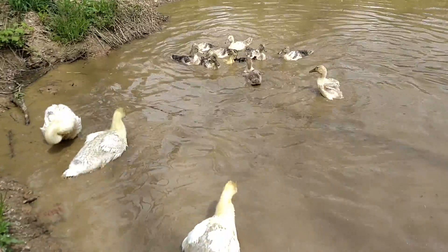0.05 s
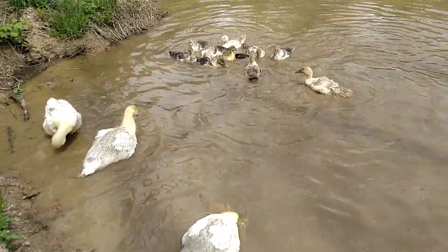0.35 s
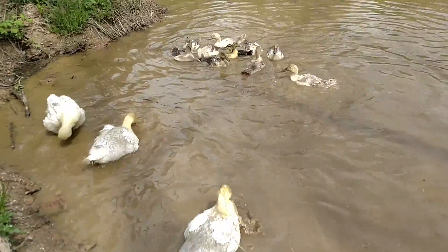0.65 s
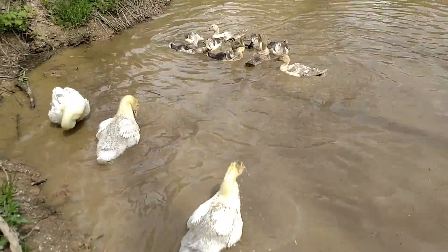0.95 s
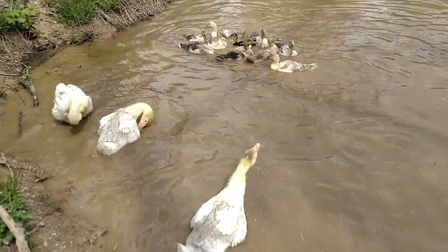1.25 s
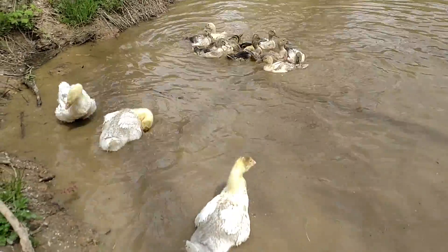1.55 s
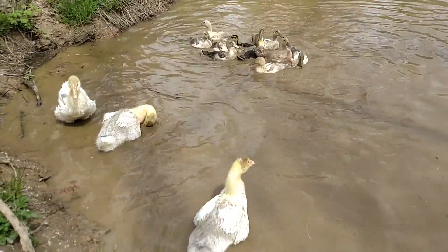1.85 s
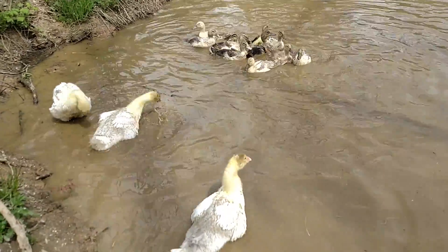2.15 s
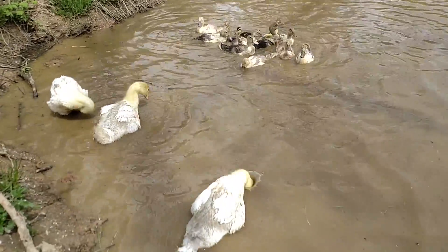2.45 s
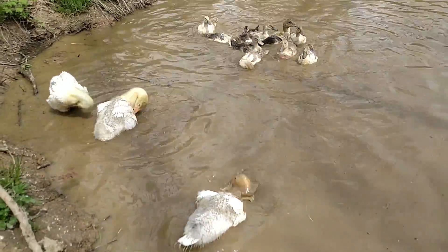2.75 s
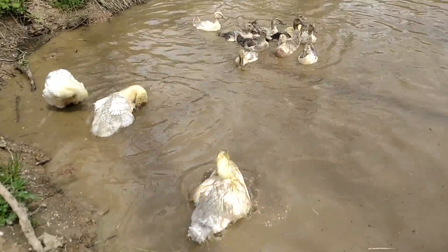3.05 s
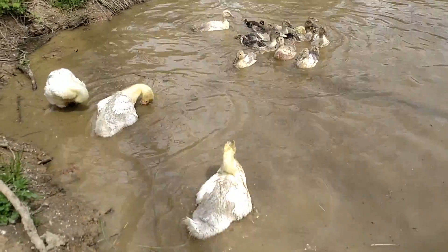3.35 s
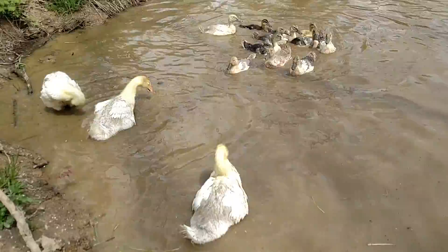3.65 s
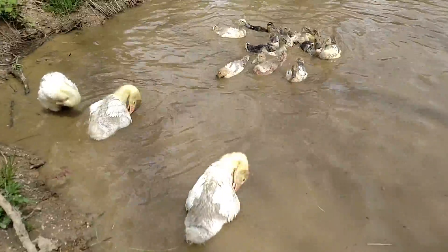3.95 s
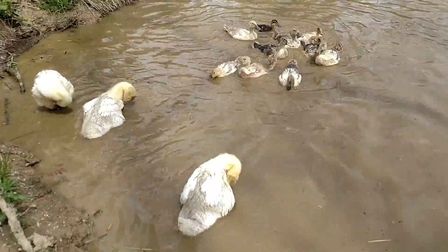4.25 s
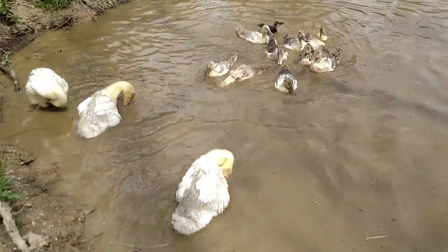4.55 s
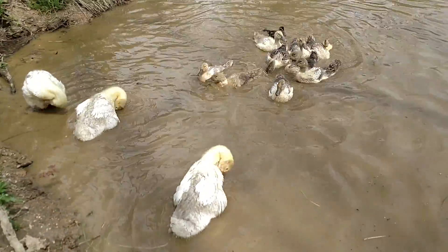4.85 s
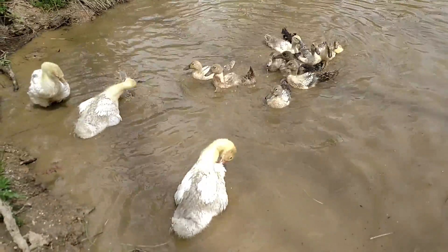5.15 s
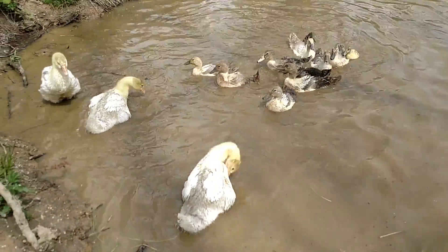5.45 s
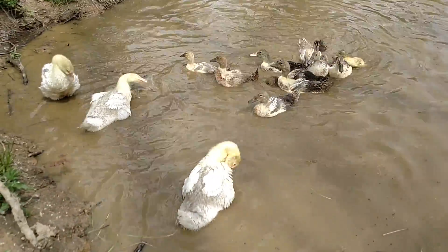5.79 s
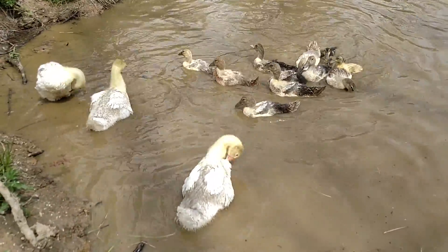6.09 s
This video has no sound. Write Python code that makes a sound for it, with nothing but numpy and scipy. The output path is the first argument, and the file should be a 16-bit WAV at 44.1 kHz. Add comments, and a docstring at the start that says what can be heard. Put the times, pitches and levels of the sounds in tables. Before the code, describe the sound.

Pond water laps and gurgles gently close to the microphone, over a low wind rumble with a few brief buffets. Young geese dabble their bills, making small bubbly plops and drips, with sharper ones around 0.8 and 1.4 seconds. Water sloshes softly and patters back as a bird ducks its head at about 0.8 seconds, lightly at 2.1, longest around 3.1, and again at 5.2 and 5.9. From 2.3 seconds the nearby birds mutter in very short, muffled clucks, thickest between 3 and 4 seconds, alongside flurries of bubbles and drops, then sparser. Farther out, ducklings give faint, thin, arching peeps throughout, joined by tiny falling chirps from about 4 seconds. At about 5.9 seconds a distant rooster faintly starts to crow and is cut off almost at once.

```python
"""Goslings and ducklings bathing in a muddy farm pond, the water close to the microphone.
Ducklings out on the pond peep in short arched whistles and chirp; nearer birds mutter in tiny clucks.
Bills dabble, trapped bubbles plop, and water sloshes and patters back whenever a head is ducked.
Wind rumbles softly underneath, and near the end a rooster starts to crow far across the yard."""
import sys
import numpy as np
from scipy import signal
from scipy.fft import rfft, irfft
from scipy.io import wavfile

SR = 44100
rng = np.random.default_rng(int(sys.argv[2]) if len(sys.argv) > 2 else 0)


def file_out(sig):
    """Save sig as 16-bit WAV at sys.argv[1]."""
    # one column per channel
    cols = np.atleast_2d(sig).T
    # limit, then scale
    lim = np.clip(cols, -1, 1)
    pcm = np.round(lim * 32767).astype(np.int16)
    wavfile.write(sys.argv[1], SR, pcm)


N = 269892
T = np.arange(N) / SR

# a bird ducks its head and throws water over its back: (centre [s], length [s], slosh [dB], spray [dB])
DUNKS = [(0.831, 0.51, -54, -67), (2.124, 0.29, -61, -77), (3.117, 0.66, -52.5, -67),
         (5.217, 0.43, -53, -70.5), (5.932, 0.25, -60.5, -72)]
# spectrum of the stirred pond surface: (frequency [Hz], relative level [dB])
LAPPING_SPECTRUM = [(350, -14), (520, -3.5), (700, -3), (950, 1), (1400, -5.5), (2000, -11), (2500, -21.5),
                    (3200, -33.5), (5000, -41), (12000, -50)]


def from_db(db):
    """Decibels to gain."""
    return 10 ** (np.asarray(db) / 20)


def unit_rms(x):
    """Scale to unit power."""
    return x / np.sqrt(np.mean(x ** 2) + 1e-20)


def in_time(rows):
    """One curve for each column after a table's time column."""
    times, *columns = np.transpose(rows)
    return [np.interp(T, times, column) for column in columns]


def at_hz(spectrum, hz):
    """Read a spectrum's level on a log-frequency axis."""
    freqs, levels = np.transpose(spectrum)
    return np.interp(np.log(np.maximum(hz, 1)), np.log(freqs), levels)


def coloured(x, spectrum):
    """Filter a signal by a smooth spectrum; rms 1."""
    hz = np.arange(N // 2 + 1) * SR / N
    return unit_rms(irfft(rfft(x) * from_db(at_hz(spectrum, hz)), N))


def noise(spectrum):
    """Noise with the given spectrum; rms 1."""
    return coloured(rng.standard_normal(N), spectrum)


def drift(rate_hz):
    """Random wander of spread 1, mostly slower than rate_hz."""
    return noise([(rate_hz, 0), (rate_hz * 10, -60)])


def bump(centre, length):
    """A smooth swell of height 1."""
    return np.exp(-np.minimum((2 * (T - centre) / length) ** 2, 20))


def add(out, start, sound):
    """Mix a short sound in at a start time in seconds."""
    i = max(int(start * SR), 0)
    out[i:i + len(sound)] += sound[:max(N - i, 0)]


def ring(clicks, hz, t60):
    """A unit click sets a sine of height 1 ringing."""
    decay, angle = from_db(-60 / (t60 * SR)), 2 * np.pi * hz / SR
    return signal.lfilter([0, np.sin(angle)], [1, -2 * decay * np.cos(angle), decay ** 2], clicks + 1e-18)


def bubble_swarm(per_s, low_hz, high_hz, cycles, spread_db, pitch_count=24):
    """Little bubbles of random size and pitch, each dying away over some cycles; rms 1."""
    sizes = from_db(spread_db * np.minimum(rng.exponential(1, N), 4))
    clicks = sizes * rng.choice([-1, 1], N) * (rng.random(N) < per_s / SR)
    pitch_index = rng.integers(0, pitch_count, N)
    pitches = np.geomspace(low_hz, high_hz, pitch_count)
    return unit_rms(sum(hz * ring(clicks * (pitch_index == k), hz, cycles / hz)
                        for k, hz in enumerate(pitches)))


def wind():
    """Low turbulence that swells with the breeze and with single buffets."""
    # strength of the breeze: (time [s], level [dB])
    breeze = [(0.0, -41.5), (0.36, -38), (2.5, -42), (3.54, -41.5), (5.86, -43.5), (6.12, -44)]
    # brief buffets of air: (centre [s], length [s], boost [dB])
    buffets = [(0.178, 0.028, 5), (0.96, 0.074, 1.5), (1.49, 0.09, 4), (1.773, 0.017, 8.5), (3.604, 0.1, 7),
               (3.936, 0.049, 3)]
    # spectrum of the rumble: (frequency [Hz], relative level [dB])
    rumble = [(15, 1.5), (30, -6.5), (45, -3), (70, -2), (105, 4), (150, 0.5), (210, -4.5), (290, -11.5),
              (400, -25), (600, -59), (2000, -71)]
    level_db, = in_time(breeze)
    buffet_db = sum(boost_db * bump(centre, length) for centre, length, boost_db in buffets)
    return from_db(level_db + buffet_db) * noise(rumble)


def hiss(level_db=-72.2):
    """A faint, steady hiss behind the pond."""
    # spectrum of the hiss: (frequency [Hz], relative level [dB])
    spectrum = [(3300, 0), (4500, -2), (6000, -5), (8000, -5.7), (10000, -6), (12500, -7), (15000, -9.5)]
    return from_db(level_db) * noise(spectrum)


def slosh(calm_db=-62.5, lead_s=0.033, length_share=0.94):
    """A deep wash of water that swells at each dunk, just ahead of the spray."""
    # spectrum of the slosh: (frequency [Hz], relative level [dB])
    spectrum = [(220, -25), (320, 12), (420, 9.5), (540, 3), (800, -34), (3000, -62)]
    plunge = sum(from_db(slosh_db) * bump(centre - lead_s, length * length_share)
                 for centre, length, slosh_db, _ in DUNKS)
    return np.hypot(from_db(calm_db), plunge) * noise(spectrum)


def shower():
    """The swell of thrown water at each dunk, as a gain curve."""
    return sum(from_db(spray_db) * bump(centre, length) for centre, length, _, spray_db in DUNKS)


def lapping(wash_db=-0.5, bubble_db=-3.5, over_shower_db=10.5):
    """Ripples around the swimming birds: a smooth wash with clumps of bubbles, louder at each dunk."""
    # lapping between dunks: (time [s], level [dB])
    ripples = [(0.0, -53), (2.0, -52), (2.39, -53), (3.34, -53), (4.05, -54.5), (5.8, -55.5)]
    ripple_db, = in_time(ripples)
    bubbles = bubble_swarm(450 * from_db(3 * drift(9.8)), 404, 2565, cycles=14.3, spread_db=-1.5)
    wash = from_db(wash_db) * noise(LAPPING_SPECTRUM)
    gurgle = from_db(bubble_db) * coloured(bubbles, LAPPING_SPECTRUM)
    return np.hypot(from_db(ripple_db), from_db(over_shower_db) * shower()) * (wash + gurgle)


def spray(calm_db=-73.5, mist_db=-0.5, fizz_db=-5.5, top_hz=9000):
    """Fine mist and clumps of fizzing droplets that swell with each dunk."""
    # spectrum of the spray: (frequency [Hz], relative level [dB])
    spectrum = [(1500, -1), (2500, 14), (3300, 7.5), (4500, 8), (6000, 3), (8000, -1), (10000, 0),
                (13000, -45)]
    droplets = bubble_swarm(260 * from_db(5 * drift(12)), 2800, 10000, cycles=8, spread_db=4.0)
    mist = from_db(mist_db) * noise(spectrum)
    fizz = from_db(fizz_db) * coloured(droplets, spectrum)
    softened = signal.sosfilt(signal.butter(6, top_hz, fs=SR, output="sos"), mist + fizz)
    return np.hypot(from_db(calm_db), shower()) * softened


def plops(attack_s=0.00045, rise_octaves_per_s=15.2, most_octaves=0.457):
    """A trapped bubble rings and climbs in pitch until it reaches the surface."""
    # bubbles from dipping bills: (time [s], starting pitch [Hz], level [dB], ring t60 [s])
    bubbles = [(0.010, 780, -30, 0.011), (0.195, 1700, -55, 0.076), (0.641, 867, -37, 0.093),
               (0.804, 700, -29, 0.17), (1.034, 1606, -45.5, 0.081), (1.356, 1150, -21, 0.0095),
               (1.515, 1280, -39.5, 0.043), (2.054, 1130, -34.5, 0.028), (2.163, 835, -45, 0.022),
               (3.227, 825, -33.5, 0.035), (3.321, 1304, -30.5, 0.027), (3.48, 1375, -30.5, 0.022),
               (3.5238, 1130, -29.5, 0.018), (4.775, 1160, -37.5, 0.02), (4.861, 730, -35, 0.14),
               (4.911, 2280, -43.5, 0.05), (5.669, 910, -36.5, 0.016), (5.814, 1530, -36.5, 0.028),
               (5.844, 900, -37.5, 0.05), (5.865, 1270, -30, 0.011)]
    out, t = np.zeros(N), T[:SR // 6]
    climb = 2 ** np.minimum(rise_octaves_per_s * t, most_octaves)
    onset = 1 - np.exp(-t / attack_s)
    for start, hz, level_db, t60 in bubbles:
        phase = 2 * np.pi * np.cumsum(hz * climb) / SR
        add(out, start, onset * from_db(level_db - 60 * t / t60) * np.sin(phase))
    return out


def peeps(sag=0.99, edge_s=0.0018, press_db=7.5, trim_db=-1.0):
    """Ducklings' thin, trembling whistles arch up and fall; the octave flashes just past mid-call."""
    # duckling calls: (start [s], length [s], top pitch [Hz], crest [share of call],
    # level [dB], octave relative to fundamental [dB])
    calls = [(0.26, 0.067, 2220, 0.51, -56, -23), (0.456, 0.09, 2480, 0.59, -58.5, -19),
             (1.202, 0.095, 2620, 0.41, -69.5, -20), (1.735, 0.065, 2510, 0.51, -56, -22),
             (2.182, 0.07, 2820, 0.62, -65, -20), (2.37, 0.08, 2594, 0.39, -58, -10),
             (2.593, 0.064, 2900, 0.51, -61.5, -20), (2.943, 0.068, 2730, 0.58, -54, -22),
             (3.26, 0.1, 2750, 0.22, -55, -11), (3.54, 0.066, 2880, 0.39, -55, -26),
             (3.723, 0.069, 2700, 0.36, -57, -10), (3.898, 0.057, 2680, .42, -64, -20),
             (4.036, 0.055, 2700, 0.5, -60, -15), (4.117, 0.059, 3270, .35, -67, -2),
             (4.265, 0.066, 2760, 0.47, -53.5, -15), (4.465, 0.063, 2780, 0.41, -53.5, -18),
             (4.919, 0.099, 2740, 0.41, -65, -19), (5.099, 0.09, 2540, .43, -61.5, -18),
             (5.145, 0.032, 2130, 0.47, -50, -23), (5.148, 0.057, 3140, .47, -62, -9),
             (5.165, 0.072, 2850, 0.29, -60, -23), (5.306, 0.074, 2550, 0.45, -54, -24),
             (5.369, 0.068, 2960, 0.35, -61, -16), (5.396, 0.062, 3150, .4, -56.5, -14),
             (5.607, 0.094, 2740, 0.31, -63, -22), (5.881, 0.066, 2740, 0.42, -60.5, -16)]
    out = np.zeros(N)
    tremble, flutter_db = .021 * drift(220), 3 * drift(90)
    for start, length, top_hz, crest, level_db, octave_db in calls:
        span = slice(int(start * SR), int((start + length) * SR))
        progress = np.linspace(0, 1, len(T[span]))
        hz = top_hz * (1 - sag * (progress - crest) ** 2)
        phase = 2 * np.pi * np.cumsum(hz * (1 + tremble[span])) / SR
        octave = from_db(octave_db) * np.exp(-((progress - 0.6) / 0.24) ** 2)
        tone = np.sin(phase) + octave * np.sin(2 * phase)
        push_db = press_db * (progress - .5)  # the call is pressed harder towards its end
        swell = (4 * progress * (1 - progress)) ** 0.1
        edges = np.minimum(1, np.minimum(progress, 1 - progress) * length / edge_s)
        add(out, start, from_db(level_db + trim_db + push_db + flutter_db[span]) * swell * edges * tone)
    return out


def patter(per_dunk=6, hz=4280, spread_octaves=0.15, level_db=-57, spread_db=4.5):
    """Small drops scattered around every dunk, as rows (time [s], pitch [Hz], level [dB])."""
    return [(centre + length * when / 2, hz * 2 ** (spread_octaves * pitch), level_db + spread_db * size)
            for centre, length, *_ in DUNKS
            for when, pitch, size in np.clip(rng.standard_normal((per_dunk, 3)), -2, 2)]


def drops(scatter_s=0.0013, cycles=12, crack_gain=0.033, top_hz=8800):
    """A drop hits with a brief swelling crackle that rings a tiny cavity; soft water dulls its top."""
    # larger drops and bill snaps striking the surface: (time [s], pitch [Hz], level [dB])
    strikes = [(0.401, 2480, -45.5), (0.766, 4370, -49.5), (0.878, 7700, -54), (1.033, 3240, -52),
               (1.4702, 2370, -37), (1.812, 7200, -45.5), (1.858, 2290, -46), (2.249, 2980, -47.5),
               (2.673, 4700, -57), (2.774, 4670, -53), (3.155, 4800, -43.5), (3.181, 4800, -44.5),
               (3.227, 4870, -55), (3.266, 4460, -47), (3.306, 5100, -49), (3.318, 4900, -49),
               (3.366, 4800, -53), (3.4095, 4830, -46), (3.482, 4440, -44), (3.524, 4380, -50.5),
               (5.2576, 1040, -39.5), (5.258, 2050, -36.5), (5.259, 5100, -43), (5.82, 2230, -40),
               (5.8944, 4630, -46.5), (5.902, 6570, -51.5)]
    out, t = np.zeros(N), T[:SR // 30]
    for start, hz, level_db in strikes + patter():
        impact = rng.standard_normal(len(t)) * t * np.exp(-t / scatter_s)
        crack = signal.sosfilt(signal.butter(2, [hz / 2, hz * 2], "band", fs=SR, output="sos"), impact)
        tick = unit_rms(ring(impact, hz, cycles / hz)) + crack_gain * unit_rms(crack)
        add(out, start, from_db(level_db) * tick / np.abs(tick).max())
    return signal.sosfilt(signal.butter(3, top_hz, fs=SR, output="sos"), out)


def dabbles():
    """A bill rattling in the water close by throws up a dense flurry of small bubbles."""
    # flurries of bubbles: (centre [s], length [s], level [dB])
    flurries = [(0.713, 0.03, -48), (1.134, 0.024, -46.5), (2.162, 0.052, -48.5), (2.837, 0.021, -46),
                (3.186, 0.024, -48), (3.34, 0.13, -50), (3.535, 0.12, -50)]
    swell = sum(from_db(level_db) * bump(centre, length) for centre, length, level_db in flurries)
    bubbles = bubble_swarm(1500, 580, 2920, cycles=26, spread_db=3.0)
    return swell * coloured(bubbles, LAPPING_SPECTRUM)


def clucks(length_s=0.017, usual_hz=345, top_hz=2500, smear_rad=0.14):
    """A few sharp throat pulses under one swell; the closed bill muffles the top."""
    # soft clucks near the microphone: (centre [s], pitch [Hz], level [dB])
    calls = [(2.299, 408, -32.5), (2.336, 325, -26), (2.7366, 381, -30), (2.954, 282, -39),
             (2.973, 319, -27.5), (3.133, 361, -24.5), (3.236, 283, -27.5), (3.299, 416, -29),
             (3.485, 364, -28.5), (3.571, 300, -38), (3.734, 308, -31), (3.77, 303, -33), (3.9, 338, -25),
             (3.926, 314, -30), (4.307, 293, -36.5), (4.404, 424, -28), (5.082, 320, -33.5),
             (5.105, 320, -35), (5.76, 290, -31.5), (6.098, 332, -28.5)]
    out, waver = np.zeros(N), .025 * drift(150)
    k = np.arange(1, 11)[:, None]  # harmonic numbers
    for centre, hz, level_db in calls:
        span = slice(int((centre - length_s / 2) * SR), int((centre + length_s / 2) * SR))
        phase = 2 * np.pi * np.cumsum(hz * (1 + waver[span])) / SR
        phase -= phase[len(phase) // 2]
        tilt_db_per_octave = -7 + 14 * np.log2(hz / usual_hz)  # a tighter throat is higher and brighter
        harmonic_db = tilt_db_per_octave * np.log2(k) + 1.5 * rng.standard_normal(k.shape)
        harmonic_db[0] -= 4  # the small throat weakens the fundamental
        strengths = from_db(harmonic_db) / (1 + (k * hz / top_hz) ** 14)
        pulses = np.sum(strengths * np.cos(k * phase - smear_rad * k ** 2), axis=0) / strengths.sum()
        add(out, T[span][0], from_db(level_db) * np.hanning(len(phase)) * pulses)
    return out


def chirps(length_s=0.0265, fall_octaves=0.404, faint_hz=2350, faint_count=18):
    """Tiny falling chirps from the huddle of ducklings: a few clear ones among many faint ones."""
    # the clear chirps: (start [s], starting pitch [Hz], level [dB])
    clear = [(3.992, 2480, -50.5), (4.63, 2520, -49.5), (4.985, 2380, -52), (5.486, 2300, -53),
             (5.797, 2220, -48), (5.862, 2650, -50.5)]
    out, progress = np.zeros(N), np.linspace(0, 1, int(length_s * SR))
    scatter = rng.uniform([3.9, -.15, -63], [5.8, .25, -57], (faint_count, 3))
    faint = [(start, faint_hz * 2 ** octaves, level_db) for start, octaves, level_db in scatter]
    for start, hz, level_db in clear + faint:
        phase = 2 * np.pi * np.cumsum(hz * 2 ** (-fall_octaves * progress)) / SR
        add(out, start, from_db(level_db) * np.sin(np.pi * progress) * np.sin(phase))
    return out


def rooster(hoarseness=0.016):
    """A strained, slightly hoarse crow from across the yard: six harmonics shaped by the throat."""
    # start of the crow: (time [s], pitch [Hz], level before the throat [dB])
    crow = [(5.865, 647.4, -92), (5.89, 654, -49), (5.93, 640, -55.5), (5.96, 619, -57), (6.0, 635, -52.5),
            (6.03, 731, -58), (6.08, 750, -53.5), (6.12, 713, -65)]
    # resonances of the throat: (frequency [Hz], gain [dB])
    throat = [(600, 9), (1200, -6), (1500, 3), (1850, -12), (2350, -7), (3100, -53), (4500, -21)]
    hz, level_db = in_time(crow)
    phase = 2 * np.pi * np.cumsum(hz * (1 + hoarseness * drift(90))) / SR
    voice = sum(from_db(at_hz(throat, k * hz)) * np.sin(k * phase) for k in range(1, 7))
    return voice * from_db(level_db) * (T > crow[0][0])


def with_bank_echo(direct, echo_db, t60, delay_s=0.004):
    """The direct sound plus its diffuse scatter from the banks and bushes."""
    t = T[:SR // 2]
    tail = rng.standard_normal(len(t)) * from_db(-60 * t / t60) * (t > delay_s)
    tail /= np.sqrt(np.sum(tail ** 2))
    return direct + from_db(echo_db) * signal.fftconvolve(direct, tail)[:N]


def scene():
    """One microphone at the pond: the farther the source, the stronger and longer its echo."""
    near = plops() + drops() + dabbles() + clucks()
    out_on_pond = peeps() + chirps()
    far = rooster()
    birds = (with_bank_echo(near, echo_db=-13.5, t60=0.051)
             + with_bank_echo(out_on_pond, echo_db=-9, t60=0.1)
             + with_bank_echo(far, echo_db=-4, t60=0.4))
    water = lapping() + slosh() + spray()
    return (birds + water + wind() + hiss())[None]


def record(dry):
    """The microphone's signal, eased in and out, with the top cut steeply."""
    fade_s, cutoff_hz = 0.003, 15450
    ease = np.minimum(1, np.minimum(T, T[-1] - T) / fade_s)
    return signal.sosfilt(signal.ellip(12, .1, 80, cutoff_hz, fs=SR, output="sos"), dry * ease)


dry = scene()
out = record(dry)
file_out(out)
```